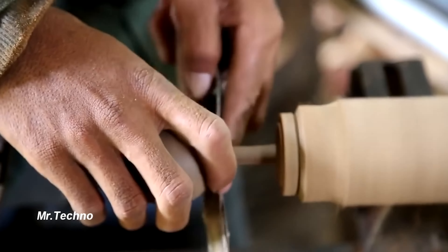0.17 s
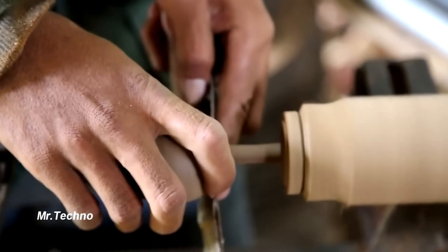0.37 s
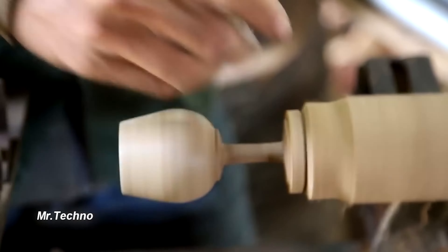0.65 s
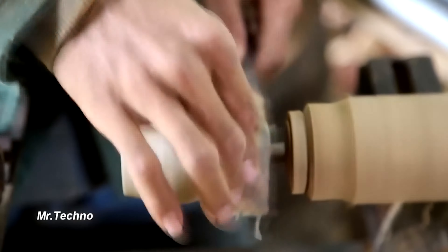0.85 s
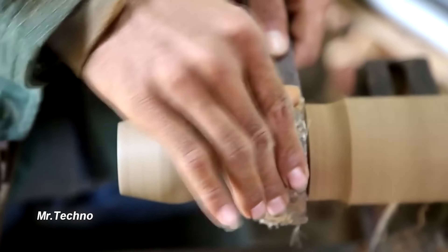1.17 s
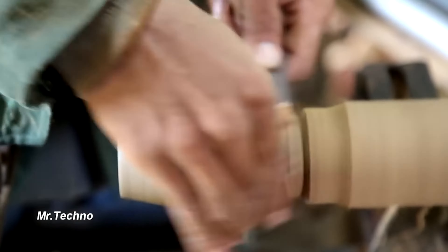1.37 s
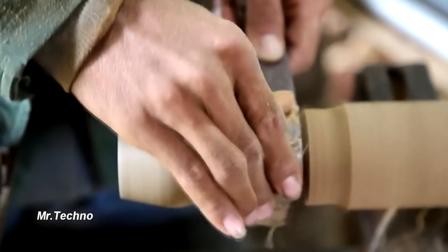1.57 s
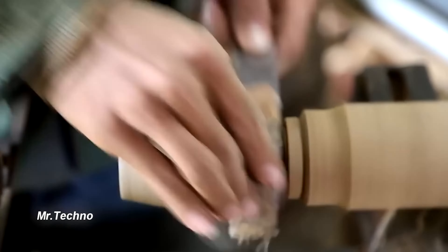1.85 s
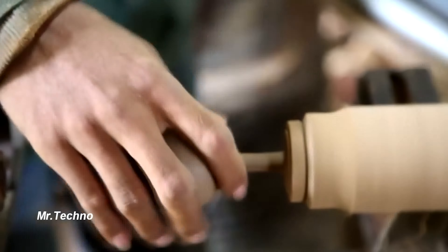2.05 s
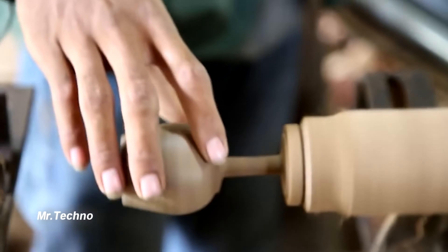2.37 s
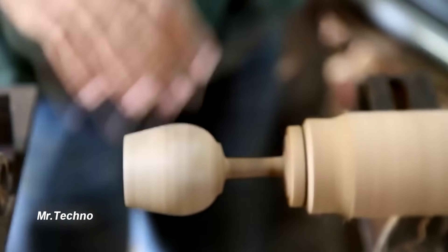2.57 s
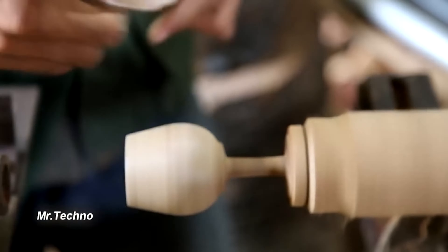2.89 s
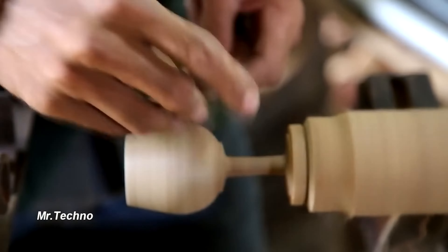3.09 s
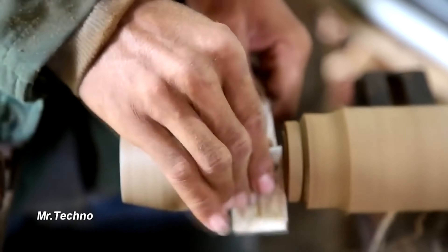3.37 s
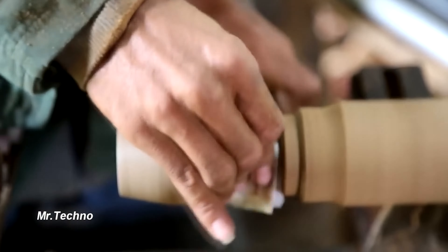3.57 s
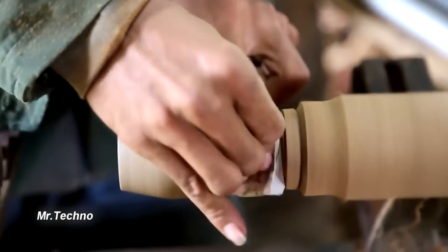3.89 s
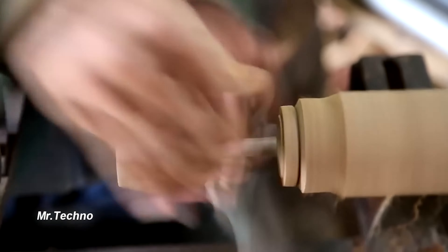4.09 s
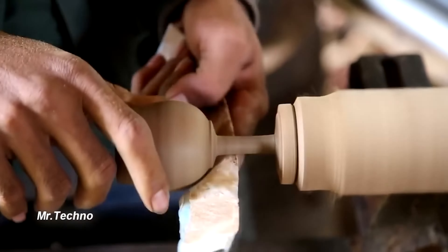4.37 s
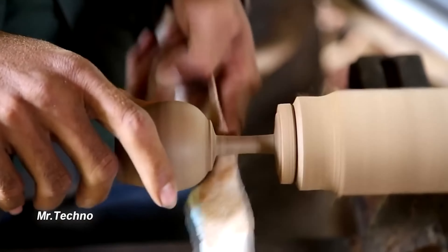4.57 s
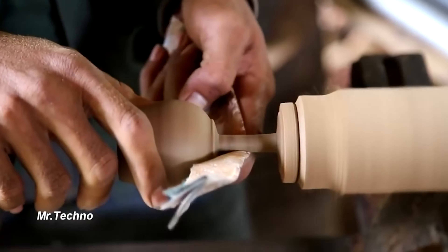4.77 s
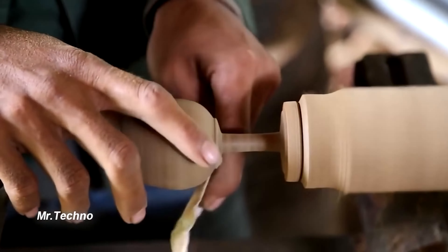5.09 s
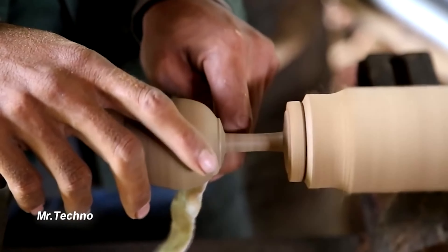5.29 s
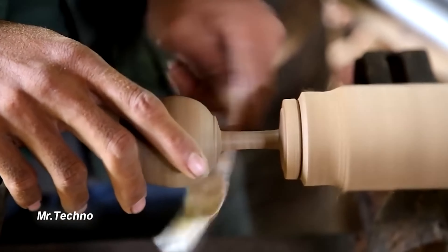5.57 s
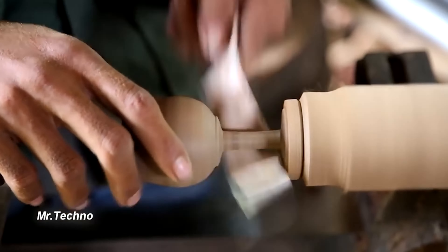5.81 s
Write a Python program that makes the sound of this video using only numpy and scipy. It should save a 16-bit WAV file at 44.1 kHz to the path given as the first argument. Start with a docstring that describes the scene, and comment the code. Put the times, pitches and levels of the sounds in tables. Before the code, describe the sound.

Close in a workshop, a belt-driven lathe spins at constant speed. Dense, bright sandpaper hiss rubs against turning wood throughout, slightly pulsing with each revolution. Beneath it lie a fluttering motor hum and a steady bearing whine. Faint bumps come in the first second, two soft knocks near two and a half, and a firmer double knock just after three. Centred, dry sound with little room.

```python
"""In a workshop a belt-driven wood lathe runs while sandpaper is held against the spinning piece.
Motor and spindle hum in fluttering tones on multiples of their turning rates.
The bearing whines on multiples of its own rate and throbs with each lap of the belt.
Grit is shaped noise ringing through wood and machine; a firmer hand lifts the lows more than the highs.
A few soft knocks are short dying bumps, each with a puff of banded noise. Both channels are the same."""
import sys
import numpy as np
from scipy import signal
from scipy.fft import rfft, irfft
from scipy.io import wavfile

SR = 44100
rng = np.random.default_rng(int(sys.argv[2]) if len(sys.argv) > 2 else 0)


def store_pcm(level_fs):
    """Save levels as 16-bit WAV."""
    pcm = np.round(np.clip(level_fs, -1, 1) * 32767).astype(np.int16)
    wavfile.write(sys.argv[1], SR, np.atleast_2d(pcm).T)


N = 261954
TIME = np.arange(N) / SR
HZ = np.maximum(np.arange(N // 2 + 1) * SR / N, 1)   # frequency of each FFT bin, kept off zero
SPINDLE_PER_MOTOR = 27.6 / 57.6   # spindle turns per motor turn


def from_db(db):
    """Decibels to amplitude gain."""
    return 10 ** (np.asarray(db) / 20)


def rms_one(x):
    """Scale to unit power."""
    return x / np.sqrt(np.mean(x ** 2) + 1e-20)


def in_time(rows):
    """Draw each column of a breakpoint curve sample by sample."""
    times, *columns = np.transpose(rows)
    return [np.interp(TIME, times, column) for column in columns]


def filtered(x, gain):
    """Apply a gain to every frequency."""
    return irfft(rfft(x) * gain, N)


def drift(rate_hz):
    """Smooth random wander of unit rms, made of noise rolled off above the rate."""
    return rms_one(filtered(rng.standard_normal(N), 1 / (1 + (HZ / rate_hz) ** 2)))


def once_a_turn(turns, sharpness):
    """A smooth bump on every revolution, with mean 0 and unit rms."""
    bump = np.exp(sharpness * np.cos(2 * np.pi * (turns + rng.random())))
    return rms_one(bump - bump.mean())


def partials(turns, orders, rough, flutter_hz):
    """Tones on multiples of a turning rate, each fluttering in strength and phase."""
    out = np.zeros(N)
    for order, level_db in orders:
        angle = 2 * np.pi * (round(order) * turns + rng.random())
        steady_part = (1 + rough * drift(flutter_hz)) * np.cos(angle)
        quadrature_part = rough * drift(flutter_hz) * np.sin(angle)
        out += from_db(level_db) * rms_one(steady_part + quadrature_part)
    return out


def hum(motor_turns):
    """Motor and spindle shake the bed; their close partials beat against each other."""
    # motor tones: (multiple of the motor's rate, rms level before the mix gain [dB])
    motor_orders = [(1, -77), (2, -65), (4, -65), (5, -69), (6, -58), (8, -64), (9, -58), (12, -63)]
    # spindle tones: (multiple of the spindle's rate, rms level [dB])
    spindle_orders = [(5, -70), (6, -61.5), (8, -63), (9, -60), (10, -63), (11, -65), (12, -51.5),
                      (13, -60), (14, -58), (15, -51.4), (16, -58), (18, -56), (20, -62), (21, -59),
                      (22, -63), (23, -59), (24, -62), (29, -60), (30, -59)]
    motor = partials(motor_turns, motor_orders, rough=0.18, flutter_hz=1.2)
    spindle = partials(motor_turns * SPINDLE_PER_MOTOR, spindle_orders, rough=0.21, flutter_hz=2.9)
    return from_db(0.5) * motor + spindle


def bearing(motor_turns, wobble_rad=0.03, throb=0.03):
    """Balls roll over a worn spot; pace and load swing with each motor turn, and the belt tugs once a lap."""
    # whine tones: (multiple of the bearing's rate, rms level before swell and mix gain [dB])
    whine_orders = [(2, -59), (3, -60), (4, -56.5), (5, -60), (6, -41.2), (7, -50.5), (8, -59), (9, -55),
                    (10, -62), (11, -56), (12, -55.5)]
    # slow swell of the whine, only its shape counts: (time [s], relative level [dB])
    whine_swell = [(0.0, -47), (0.17, -37), (0.28, -39), (1.84, -39), (1.97, -34.5), (2.12, -40.5),
                   (3.12, -38), (3.44, -38), (4.25, -39), (4.53, -37), (4.68, -38.5), (5.93, -35.5)]
    passes_per_turn = 237.95 / 57.6
    laps_per_turn, first_tug_s, tug_db = 0.1372, 0.087, 1.4
    surges_per_s, first_surge_s, surge_db = 2.32, 0.19, 0.75
    wander_db, wander_hz = 1.0, 6.3

    swell_db, = in_time(whine_swell)
    surge = surge_db * np.cos(2 * np.pi * surges_per_s * (TIME - first_surge_s))
    laps = laps_per_turn * (motor_turns - np.interp(first_tug_s, TIME, motor_turns))
    belt_tug = tug_db * np.cos(2 * np.pi * laps)
    whine_db = swell_db + surge + belt_tug + wander_db * drift(wander_hz)

    swing = np.cos(2 * np.pi * motor_turns)
    passes = motor_turns * passes_per_turn + wobble_rad * swing / (2 * np.pi)
    whine = partials(passes, whine_orders, rough=0.26, flutter_hz=26.6)
    envelope = rms_one(from_db(whine_db) * (1 + throb * swing))
    return from_db(1.57) * whine * envelope


def body_colour():
    """The broad slope of friction noise with the resonances of work and machine standing on it."""
    # friction noise before resonances: (frequency [Hz], level [dB per Hz])
    friction = [(25, -100), (60, -95.5), (110, -85.5), (200, -81), (330, -77), (700, -81), (1300, -76.5),
                (1800, -74), (3000, -79), (5000, -77), (8600, -78.5), (10500, -82.5), (12500, -86.5),
                (15700, -88.5)]
    # resonances of wood and machine: (centre [Hz], width [Hz], height over the friction noise [dB])
    resonances = [(342, 40, 2.5), (580, 190, 5), (851, 95, 9.5), (1102, 74, 7.9), (1467, 271, 7),
                  (1950, 77, 5.3), (2122, 55, 5.5), (2223, 65, 2.9), (2445, 133, 6.8), (2735, 28, 11),
                  (2873, 107, 5), (3205, 150, 7.6), (3484, 70, 6.5), (3796, 65, 6.5), (4116, 328, 6.8),
                  (4538, 230, 7.3), (5032, 51, 5.5), (5252, 38, 14.5), (5708, 100, 4.8), (6177, 65, 5.6),
                  (6372, 88, 11.5), (6871, 46, 3.6), (7281, 85, 4.5), (7585, 140, 6.8), (8130, 140, 9.2),
                  (8357, 52, 7.8), (8574, 60, 6.8), (10004, 120, 5.5), (11272, 435, 2.2), (14814, 200, 6.5)]
    hz, level_db = np.transpose(friction)
    slope = from_db(np.interp(np.log(HZ), np.log(hz), level_db))
    peak_power = np.zeros(len(HZ))
    for centre, width, height_db in resonances:
        peak_power += from_db(height_db) ** 2 / (1 + (2 * (HZ - centre) / width) ** 2)
    return slope * np.sqrt((1 + peak_power) * SR / 2)   # SR / 2: from level per Hz to white-noise gain


def reflections(x, echo_db=-22, dull_hz=2800, count=16):
    """Bench and walls throw short waves back within hundredths of a second and ripple the treble."""
    delays_s = rng.uniform(0.006, 0.045, count)
    echoes = sum(np.exp(-2j * np.pi * HZ * delay) for delay in delays_s)
    gain = from_db(echo_db) / (1 + (dull_hz / HZ) ** 2)   # low notes hardly echo
    return filtered(x, (1 + gain * echoes) / np.sqrt(1 + count * gain ** 2))


def sanding(motor_turns, rub_hz=1200, hiss_hz=5200, fine_hz=9300, grit_db=1.4, unsteady_db=0.77):
    """Grains scrape the wood as four bands of noise, all following the pressure of the hand."""
    # pressure of the hand on the paper: (time [s], level about its mean [dB])
    pressure = [(0.0, -0.1), (0.17, 1.5), (0.33, -1), (0.45, 1.1), (0.89, -0.8), (1.0, 0.2), (1.52, -0.1),
                (1.65, 0.4), (2.12, -0.8), (2.25, 1.3), (2.6, 0.0), (3.88, 0.5), (4.0, -1.7), (4.12, 0.35),
                (5.37, -0.2), (5.53, -0.5), (5.64, 0.4), (5.93, 0.0)]
    # extra movement of the finest hiss: (time [s], level about its mean [dB])
    fine_hiss = [(0.0, -0.2), (0.89, 0.7), (1.21, 2.2), (2.08, 0), (2.29, 1), (2.56, 0), (2.92, 1.7),
                 (3.25, -0.8), (3.48, 0.5), (4.04, -0.5), (4.21, 1.2), (4.68, -2.5), (5.17, 1), (5.93, -1)]
    tremor_db, tremor_hz = 0.43, 6.4   # the hand is never quite still

    press_db = in_time(pressure)[0] + tremor_db * drift(tremor_hz)
    fine_db, = in_time(fine_hiss)
    high_spot = once_a_turn(motor_turns * SPINDLE_PER_MOTOR, sharpness=4.1)
    shake_db = 0.4 * once_a_turn(motor_turns, sharpness=1.5)
    grip_db = grit_db * drift(1900)   # fast grain shared by all bands

    # first factor: dB gained per dB of pressure
    rub_level = 1.2 * press_db + 1.2 * high_spot + shake_db
    rasp_level = 0.97 * press_db + 0.32 * high_spot + shake_db
    hiss_level = 0.61 * press_db + shake_db / 2
    fine_level = 0.6 * press_db + fine_db

    # share of power above each edge; the four bands add up to flat noise
    above = [1] + [1 / (1 + (edge / HZ) ** 8) for edge in (rub_hz, hiss_hz, fine_hz)] + [0]
    out = np.zeros(N)
    for k, level_db in enumerate([rub_level, rasp_level, hiss_level, fine_level]):
        moving_db = grip_db + level_db + unsteady_db * drift(21)
        scrape = rng.standard_normal(N) * from_db(moving_db)
        band_share = np.abs(above[k] - above[k + 1])
        out += filtered(rms_one(scrape), np.sqrt(band_share))
    return from_db(-0.5) * reflections(filtered(out, body_colour()))


def knocks(cycles=2.7, scuff_db=-17, scuff_t60_s=0.072):
    """Dull bumps die within a few cycles, each trailing a woody scuff around and above its pitch."""
    # soft knocks: (time [s], peak of the bump [dB], pitch [Hz])
    knock_list = [(0.148, -46, 72), (0.356, -43, 180), (0.609, -42, 135), (0.785, -52, 94.8),
                  (2.318, -35, 230), (2.564, -31.5, 292), (3.203, -22.5, 370), (3.210, -29, 439.3),
                  (3.220, -36, 235), (5.243, -55, 85)]
    out = np.zeros(N)
    for start, peak_db, hz in knock_list:
        since = np.maximum(TIME - start, 0)
        age = since * hz   # in cycles
        bump = -np.sin(2 * np.pi * age) * age * from_db(-60 * np.minimum(age / cycles, 10))
        # little is radiated below the pitch
        thin = signal.butter(1, hz / 2, "high", fs=SR, output="sos")
        bump = signal.sosfilt(thin, bump)

        band = signal.butter(2, [hz * 0.77, hz * 2.6], "band", fs=SR, output="sos")
        noise = rms_one(signal.sosfilt(band, rng.standard_normal(N)))
        fade = (1 - np.exp(-2 * age)) * from_db(-60 * np.minimum(since / scuff_t60_s, 10))
        scuff = from_db(scuff_db) * fade * noise   # level against the bump's peak
        out += from_db(peak_db) * (bump / np.abs(bump).max() + scuff)
    return out


def scene():
    """Hum, whine and sanding turn with the motor; knocks fall on top, alike in both channels."""
    # motor speed: (time [s], speed [turns per s])
    motor_speed = [(0.0, 57.66), (0.2, 58), (0.56, 58.2), (1.36, 57.5), (2.17, 57.64), (3.52, 57.57),
                   (3.77, 57.34), (3.92, 57.49), (4.88, 57.55), (5.08, 57.6), (5.68, 57.65), (5.93, 57.82)]
    speed, = in_time(motor_speed)
    motor_turns = np.cumsum(speed) / SR
    lathe = hum(motor_turns) + bearing(motor_turns) + sanding(motor_turns) + knocks()
    return np.array([lathe, lathe])


def record(dry):
    """A steep low-pass cuts the top above 15.7 kHz."""
    low_pass = signal.ellip(14, 0.1, 90, 15700, fs=SR, output="sos")   # order, ripple dB, stop dB, Hz
    return signal.sosfilt(low_pass, dry)


dry = scene()
out = record(dry)
store_pcm(out)
```